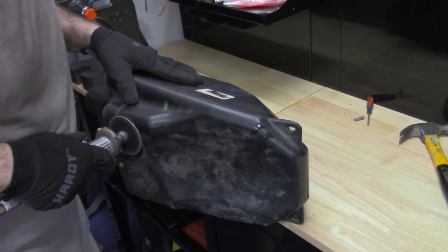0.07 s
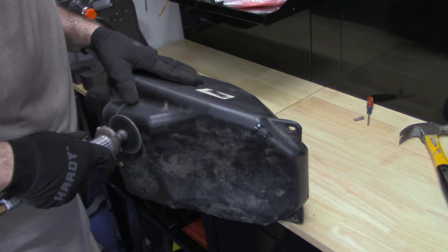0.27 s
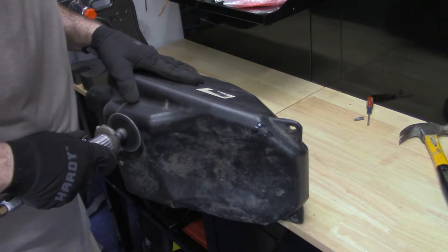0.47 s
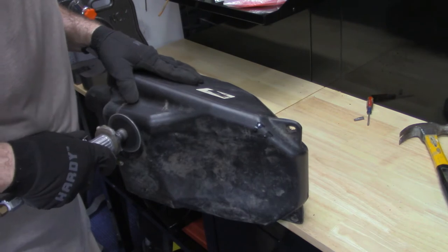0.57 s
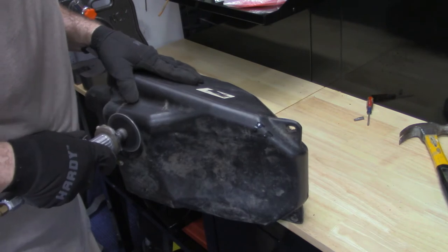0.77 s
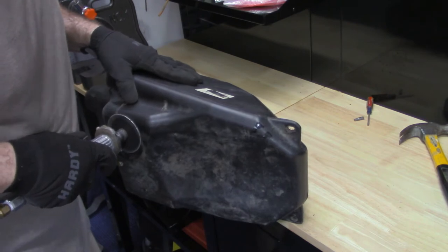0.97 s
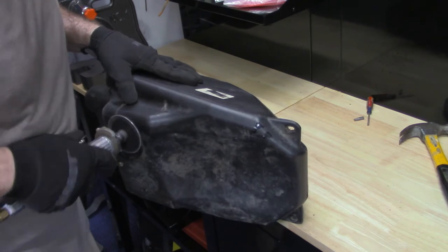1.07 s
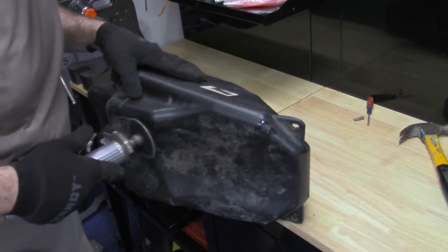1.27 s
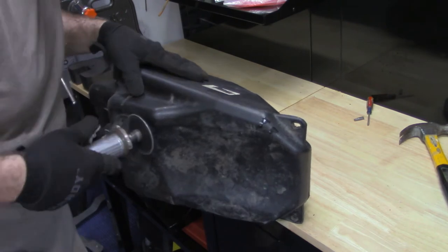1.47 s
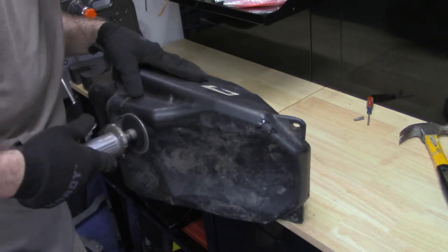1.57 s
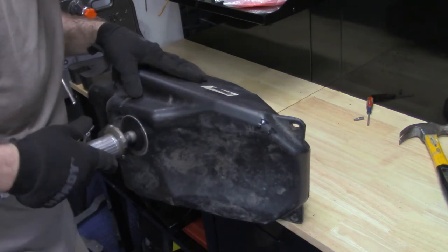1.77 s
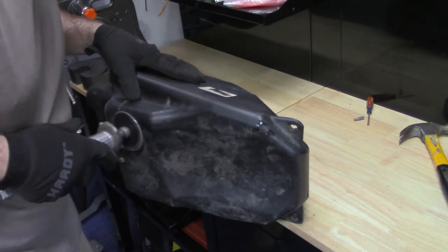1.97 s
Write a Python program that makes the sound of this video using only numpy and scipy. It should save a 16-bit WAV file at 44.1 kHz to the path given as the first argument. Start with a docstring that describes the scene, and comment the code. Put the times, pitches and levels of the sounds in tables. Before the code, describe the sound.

Pneumatic cut-off wheel buzzing harshly into a plastic tank, sagging to a stall, then a sharp clack.

```python
"""An air-driven rotary tool cuts a plastic tank, left of the microphone: its four-vane exhaust whines in
harmonics of the spindle, sagging under load, while a wheel chatters and rasps once a turn as rim grains strike.
The wheel binds and stalls, noise bursts thump the tank, air hisses through the stopped motor, then the wheel
jerks free and rings. The recorder's gain creeps back up and lifts the workshop: shaped noise and the drone
of a distant machine, made of wavering sines."""
import sys
import numpy as np
from scipy import signal
from scipy.fft import rfft, irfft, next_fast_len
from scipy.io import wavfile
from scipy.ndimage import uniform_filter1d

SR = 44100
rng = np.random.default_rng(int(sys.argv[2]) if len(sys.argv) > 2 else 0)


def store_wav(level_fs):
    """Save 16-bit WAV to argv[1]."""
    pcm = np.round(np.clip(np.atleast_2d(level_fs), -1, 1) * 32767)
    wavfile.write(sys.argv[1], SR, pcm.T.astype(np.int16))


N = 89699
T = np.arange(N) / SR  # time in s
SIDES = np.array([[.5], [-.5]])  # shares a left-over-right difference between the two channels


def from_db(db):
    """Decibels to gain."""
    return 10 ** (np.asarray(db) / 20)


def rms_one(x):
    """Scale to rms 1."""
    return x / np.sqrt(np.mean(x ** 2) + 1e-20)


def in_time(rows):
    """Read a curve over time at every sample."""
    return np.interp(T, *np.transpose(rows))


def at_hz(rows, hz, axis=1):
    """Read a column of a spectrum on a log-frequency axis."""
    rows = np.array(rows)
    return np.interp(np.log(hz + 1e-3), np.log(rows[:, 0]), rows[:, axis])


def filtered(x, response):
    """Apply a gain given as a function of frequency."""
    size = next_fast_len(N + 8192)  # padded against wrap-around
    hz = np.arange(size // 2 + 1) * SR / size
    return irfft(rfft(x, size) * response(hz), size)[..., :N]


def colour(x, spectrum):
    """Shape a white signal, keeping its power."""
    return filtered(x, lambda hz: rms_one(from_db(at_hz(spectrum, hz))))


def drift(rate_hz):
    """Slow random wander of rms 1: white noise through two equal one-pole low-passes."""
    r = np.exp(-2 * np.pi * rate_hz / SR)
    wander = signal.lfilter([1], [1, -2 * r, r * r], rng.standard_normal(2 * N))
    return rms_one(wander[N:])  # the first half lets the filter settle


def ring(x, modes):
    """Drive decaying resonances in parallel, with alternating polarity."""
    out = 0
    for k, (hz, db, t60) in enumerate(modes):
        r = from_db(-60 / (t60 * SR))
        w = 2 * np.pi * hz / SR
        mode = signal.lfilter([0, np.sin(w)], [1, -2 * r * np.cos(w), r * r], x + 1e-18)
        out = out + (-1) ** k * from_db(db) * mode
    return out


def noise_bursts(events, decay_s):
    """Noise that starts abruptly at each event and dies away exponentially."""
    envelope = sum(from_db(db) * (T >= s) * np.exp(-np.abs(T - s) / decay_s) for s, db in events)
    return envelope * rng.standard_normal(N)


# spindle speed before its jitter [t/s, turns per s]
SPINDLE_SPEED = [(0.0, 140.3), (0.035, 136.7), (0.12, 127.2), (0.2, 112.2), (0.28, 100), (0.305, 98.6),
                 (0.36, 105), (0.435, 113.2), (0.53, 108), (0.62, 97), (0.69, 86.7), (0.75, 77.3),
                 (0.84, 75.9), (0.92, 62.2), (0.97, 23)]


def spindle():
    """The spindle sags under load, with slight random jitter; its speed adds up to turns made."""
    speed = in_time(SPINDLE_SPEED) * (1 + 0.0013 * drift(60))
    return speed, np.cumsum(speed) / SR


VANES = 4
HALF_ORDER_DB, ODD_ORDER_DB, UPPER_VANE_DB = -16.5, -23.5, -3.5  # against the first three vane partials
FLUTTER, PUFF_DB = 0.24, -36  # rms share of each partial's amplitude; level of the puffed air
# strength of the exhaust pulses [t/s, level/dB]
EXHAUST_STRENGTH = [(0, 3.5), (.07, 2.5), (.14, 2.5), (.3, -3.5), (.38, 0), (.45, -1), (.53, 7.5), (.62, 5),
                    (.87, 0.5), (.92, -13), (.955, -18.5), (.99, -42), (1.05, -77)]
# an exhaust partial at its pitch, with the peaks and dips of bench and walls
# [f/Hz, level/dB, extra left over right/dB]
EXHAUST_COLOUR = [(70, -31.5, 3), (124, -31, 1), (158, -19.5, 6.5), (211, -22.5, -2), (262, -24, 2),
                  (310, -33.5, 7), (343, -24, 4), (377, -26, -10.5), (440.6, -21, 1), (444.4, -27, -1),
                  (492, -31.5, -4), (560, -25, 4), (606.6, -23, -0.5), (636, -32, -9), (705, -23, 1),
                  (765, -22, -1), (836, -31, 7.5), (871.8, -20, 6.5), (892, -22, -3), (1014, -26, -1),
                  (1070, -16.5, 2), (1192, -24, -4.5), (1267, -19.5, 0.5), (1324, -22, 0.5),
                  (1597, -26.5, 0), (1646, -21.5, 0), (1900, -39.5, 4), (2440, -36.5, 4)]
# air puffed out with each vane [f/Hz, level/dB per Hz]
PUFF_COLOUR = [(60, -35), (130, -32), (300, -30), (600, -48), (900, 1), (1400, -5), (1900, -7),
               (3000, -3.5), (8000, -42)]


def exhaust(speed, turns):
    """Four puffs a turn make the whine; unequal vanes add weak partials in between."""
    whine = 0
    for k in range(1, 6 * VANES + 1):
        if k % 2:
            order_db = ODD_ORDER_DB
        elif k % VANES:
            order_db = HALF_ORDER_DB
        else:
            order_db = UPPER_VANE_DB * (k > 3 * VANES)
        offset = rng.random() * (k % VANES > 0)  # vane partials stay in step
        hz = k * speed
        side_db = SIDES * at_hz(EXHAUST_COLOUR, hz, axis=2)
        level = from_db(order_db + at_hz(EXHAUST_COLOUR, hz) + side_db)
        whine = whine + level * (1 + FLUTTER * drift(38)) * np.cos(2 * np.pi * (k * turns + offset))
    pulsing = 1 + 1.2 * np.cos(2 * np.pi * VANES * turns)
    puffs = rms_one(pulsing * rng.standard_normal(N))
    air = from_db(PUFF_DB) * colour(puffs, PUFF_COLOUR)
    return from_db(in_time(EXHAUST_STRENGTH)) * (np.sqrt(2) * whine + air)


def contact(turns, swing_db):
    """The wobbling wheel presses into the wall of the slot once a turn, hardest at 0.4 turn."""
    return from_db(swing_db * np.cos(2 * np.pi * (turns - .4)))


CHATTER_DB, CHATTER_SWING_DB = -25, 6
# how strongly the wheel bites and chatters [t/s, level/dB]
BITE_STRENGTH = [(0, 2.5), (.08, -1.5), (.12, -9), (.21, -0.5), (.28, -7), (.36, 3), (.39, 0.5), (.44, -7),
                 (.52, 7), (.57, 1), (.63, -0.5), (.71, 7.5), (.76, 3), (.85, 7.5), (.9, 0.5), (.94, -8),
                 (.98, -39), (1.02, -72)]
# the wheel chattering against the slot once a turn [f/Hz, level/dB per Hz]
CHATTER_COLOUR = [(1700, -43), (2150, -2.5), (2450, -11.5), (2750, -15.5), (3050, -9.5), (3300, 0.5),
                  (3580, 6.5), (3950, -2.5), (4300, -15), (4800, -19), (5200, -29), (5550, -8.5),
                  (6400, -31), (7600, -35), (9000, -29), (14000, -45)]


def chatter(turns):
    """The uneven rim repeats its pattern each turn: a buzz whose partials glide through the wheel's resonance."""
    rim = signal.resample(rng.standard_normal(256), 4096)  # one turn, smoothly interpolated
    pattern = np.interp(turns % 1, np.linspace(0, 1, len(rim)), rim)
    force = pattern * contact(turns, CHATTER_SWING_DB)
    buzz = from_db(in_time(BITE_STRENGTH)) * colour(force, CHATTER_COLOUR)
    return from_db(CHATTER_DB) * rms_one(buzz)


GRAINS, GRAIN_SPREAD_DB = 48, 0  # grains on the rim, and the spread of their sizes
GRAIN_CHANGE, WOBBLE_DB = 0.66, 0.5  # random change per pass; swing of contact per turn
RING_DB, RASP_DB, DUST = -31, -24.5, 0.56  # DUST: steady noise against the grain strikes
# how hard the wheel rubs [t/s, level/dB]
RUB_STRENGTH = [(0, 2), (.07, 1.5), (.12, -1), (.22, -0.5), (.29, -1), (.36, 3.5), (.44, 1.5), (.53, 10.5),
                (.62, 5), (.72, 3.5), (.84, 1.5), (.89, 0.5), (.94, -11.5), (.975, -24), (1.02, -70)]
# the wheel's resonances in the cut [f/Hz, level/dB, t60/s]
WHEEL_MODES = [(2126, 3, 0.038), (2700, -4, 0.1), (3076, 1.5, 0.066), (3540, 2, 0.041), (3700, 9.5, 0.016),
               (3870, 2, 0.013), (4600, -13, 0.019), (5020, -2.5, .025), (5600, 0, 0.077),
               (7200, -13.5, 0.093), (7740, -0.5, 0.039), (9250, 0, 0.017)]
# rasp of the plastic, also heard in the jerk [f/Hz, level/dB per Hz]
RASP_COLOUR = [(200, -85), (700, -1.5), (1500, -0.5), (2000, -13), (2900, -4), (4000, 8.5), (4800, -3),
               (6300, -8), (7700, -6), (10500, -8), (12500, -11), (15000, -22)]


def cutting(turns):
    """The same rim grains strike on every turn, hardest where the wheel wobbles into the wall of the slot."""
    passes = int(turns[-1]) + 1
    grain_angle = (np.arange(GRAINS) + rng.random(GRAINS)) / GRAINS
    strike_turn = np.arange(passes)[:, None] + grain_angle
    polarity = rng.choice([-1, 1], GRAINS)
    size = from_db(GRAIN_SPREAD_DB * rng.uniform(-1.2, 1, GRAINS)) * polarity
    size = size * (1 + GRAIN_CHANGE * rng.standard_normal(strike_turn.shape))
    strike_sample = np.searchsorted(turns, strike_turn.ravel())
    strikes = np.bincount(strike_sample, size.ravel(), N + 1)[:N]
    rubbing = rms_one(strikes) + DUST * rng.standard_normal(N)
    force = rms_one(contact(turns, WOBBLE_DB) * rubbing)
    ringing = from_db(RING_DB) * rms_one(ring(force, WHEEL_MODES))
    rasp = from_db(RASP_DB) * colour(force, RASP_COLOUR)
    return from_db(in_time(RUB_STRENGTH)) * (ringing + rasp)


TANK_THUD_DB, TANK_RING_DB = -15, -53.5
# the wheel catches in the slot as it stalls and as it jerks free [t/s, level/dB]
CATCH_EVENTS = [(0.867, 1), (0.882, -4), (0.895, 3), (0.9142, 1), (0.92, -10), (0.925, -4), (0.935, -2.5),
                (0.951, -7), (1.143, -21.5), (1.152, -15), (1.156, -6), (1.16, -12), (1.1635, -8),
                (1.169, -10), (1.175, -11), (1.179, -5.5), (1.198, -11), (1.206, -14.5)]
# thud of the tank [f/Hz, level/dB per Hz]
THUD_COLOUR = [(50, -21), (130, -3.5), (300, 0.5), (550, 4), (900, 3), (1500, -5), (2500, -11.5),
               (8000, -41)]
# the hollow tank ringing on after each catch [f/Hz, level/dB, t60/s]
TANK_RESONANCES = [(465, -12, 0.53), (571, 0, 0.27), (730, -9, 0.22), (874, -8, .15), (1050, -10, 0.26),
                   (1243, -3, 0.18), (1410, -4, 0.16), (1670, -10, 0.086)]


def catches():
    """Each catch of the wheel thumps the tank with a noise burst and sets it ringing."""
    force = noise_bursts(CATCH_EVENTS, decay_s=0.0034)
    thud = from_db(TANK_THUD_DB) * colour(force, THUD_COLOUR)
    return thud + from_db(TANK_RING_DB) * ring(force, TANK_RESONANCES)


JERK_S, JERK_DECAY_S = 1.171, 0.0048  # the scrape swells and fades around this moment
ZING_DB, SCRAPE_DB, KNOCK_DB = -43, -23.5, -12
# resonances of the freed wheel as it zings [f/Hz, level/dB, t60/s]
FREE_WHEEL_MODES = [(3246, -5, .04), (3470, 5, 0.023), (3820, -1.5, 0.072), (4180, -7, 0.091),
                    (4350, -12, 0.15), (5360, -2, 0.081), (5680, -18, .07), (7260, -1.5, 0.062),
                    (7300, -12, 0.12), (8890, -8.5, 0.079)]
# the two hard knocks with which the wheel comes free [t/s, level/dB]
KNOCK_EVENTS = [(1.1703, -4), (1.1742, 4)]
# colour of the knocks [f/Hz, level/dB per Hz]
KNOCK_COLOUR = [(80, -12), (200, -2), (550, 5), (1000, -4), (2300, -16), (3300, -12), (3800, 1), (4700, -8),
                (5400, -3), (6300, -10), (7250, -5), (8500, -24), (15000, -21)]


def jerk():
    """A short scrape and two knocks as the wheel comes free; the scrape leaves it ringing."""
    scrape = np.exp(-np.abs(T - JERK_S) / JERK_DECAY_S) * rng.standard_normal(N)
    knocks = noise_bursts(KNOCK_EVENTS, decay_s=0.001)
    zing = from_db(ZING_DB) * ring(scrape, FREE_WHEEL_MODES)
    rasp = from_db(SCRAPE_DB) * colour(scrape, RASP_COLOUR)
    return zing + rasp + from_db(KNOCK_DB) * colour(knocks, KNOCK_COLOUR)


LEAK_DB, LEAK_ENDS_S, LEAK_FADE_DB_PER_S = -39, 1.202, 205
# air leaking through the motor [f/Hz, level/dB per Hz]
LEAK_COLOUR = [(200, -25), (1000, -3.5), (2100, -6.5), (2800, -0.5), (3600, -1), (4600, -9.5), (6000, -7),
               (7500, -10.5), (10000, -22.5), (14000, -30)]


def leak():
    """Air hisses steadily through the motor, then fades fast once the trigger is let go."""
    level_db = LEAK_DB - LEAK_FADE_DB_PER_S * np.maximum(T - LEAK_ENDS_S, 0)
    return from_db(level_db) * colour(rng.standard_normal(N), LEAK_COLOUR)


SHOP_DB, SHOP_WIDTH = -44.5, 0.78  # width: noise of each side's own against the shared noise
SHOP_LEFT_DB = 2.5  # left over right, on top of the tilt of the whole scene
DRONE_HZ, DRONE_WAVER = 28.5, 0.43  # rate of the distant machine; phase waver in radians rms
# workshop noise [f/Hz, level/dB per Hz]
SHOP_COLOUR = [(25, 0.5), (80, -7.5), (130, 2.5), (230, -1.5), (450, 1), (700, -1.5), (1100, -0.5),
               (1800, -6.5), (2800, -7.5), (4000, -13), (6500, -14.5), (8500, -22.5), (10500, -27),
               (14000, -52)]
# drone of a distant machine [multiple of its rate, level/dB]
DRONE_PARTIALS = [(2, -54), (8, -61), (10, -61), (14, -58.5), (15, -57), (16, -57.5), (17, -55.5)]


def workshop():
    """Background around the microphone: steady diffuse noise and a low, slightly wavering drone."""
    own = SHOP_WIDTH * rng.standard_normal((2, N))
    noise = colour(rms_one(rng.standard_normal(N) + own), SHOP_COLOUR)
    drone = 0
    for k, db in DRONE_PARTIALS:
        cycles = round(k) * DRONE_HZ * T + rng.random()
        phase = 2 * np.pi * cycles + DRONE_WAVER * drift(12)
        drone = drone + from_db(db) * np.sqrt(2) * np.sin(phase)
    return (from_db(SHOP_DB) * noise + drone) * from_db(SHOP_LEFT_DB * SIDES)


ROOM_T60_S = 0.22


def room(x, wet_db):
    """Direct sound plus a short diffuse tail of decaying noise, different on each side."""
    t = T[:SR // 2]
    decay = from_db(-60 * t / ROOM_T60_S)
    tail = rng.standard_normal((2, len(t))) * decay * (t > .002)  # starts 2 ms after the direct sound
    tail /= np.sqrt(np.sum(tail ** 2, axis=1, keepdims=True))
    return x + from_db(wet_db) * signal.fftconvolve(np.atleast_2d(x), tail, axes=1)[:, :N]


# left channel over right at the microphone [f/Hz, level/dB]
LEFT_OVER_RIGHT = [(60, 1.7), (200, 4.2), (380, 9.8), (700, 10.8), (1260, 8.4), (2300, 6.6), (4200, 3.9),
                   (7800, 1.3), (14000, 1.5)]
# phase lead of left over right [f/Hz, lead/radians]
LEFT_PHASE_LEAD = [(100, 0), (520, .1), (1800, -.4), (8300, -.4), (9800, -2.8), (15000, -3.1)]


def scene():
    """Tool and workshop, with the work to the left of the microphone."""
    speed, turns = spindle()
    sound = room(exhaust(speed, turns), wet_db=-15.5)
    sound = sound + room(chatter(turns), wet_db=-9)
    sound = sound + room(cutting(turns) + catches() + jerk() + leak(), wet_db=-4)
    sound = sound + workshop()

    def placement(hz):
        """Level and phase difference between left and right, shared by the two channels."""
        gain = from_db(SIDES * at_hz(LEFT_OVER_RIGHT, hz))
        return gain * np.exp(1j * SIDES * at_hz(LEFT_PHASE_LEAD, hz))

    return filtered(sound, placement)


AGC_AIM_DB, AGC_WINDOW_S, AGC_RISE_DB_PER_S = -14.5, 0.083, 14.5
STOPBAND_HZ = 16200  # 70 dB down from here up


def record(dry):
    """Gain control holds the cut down and recovers slowly; peaks are rounded, the top is cut."""
    power = uniform_filter1d(np.mean(dry ** 2, axis=0), int(AGC_WINDOW_S * SR))
    level_db = 10 * np.log10(power + 1e-12)
    rise_db = AGC_RISE_DB_PER_S * T
    held_db = np.maximum.accumulate(level_db + rise_db) - rise_db  # loudest so far, sinking steadily
    out = 1.546 * np.tanh(dry * from_db(AGC_AIM_DB - held_db) / 1.454)
    return signal.sosfilt(signal.cheby2(12, 70, STOPBAND_HZ, fs=SR, output="sos"), out)


dry = scene()
out = record(dry)
store_wav(out)
```